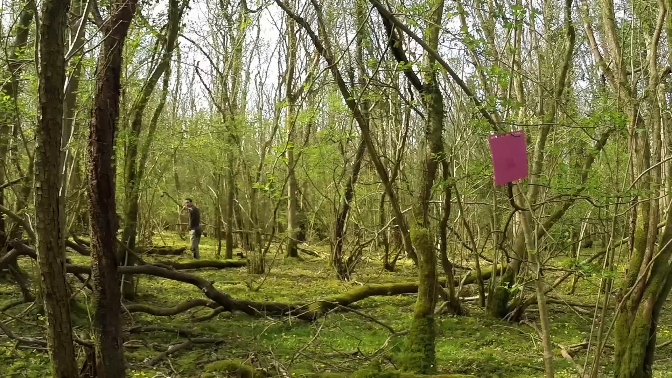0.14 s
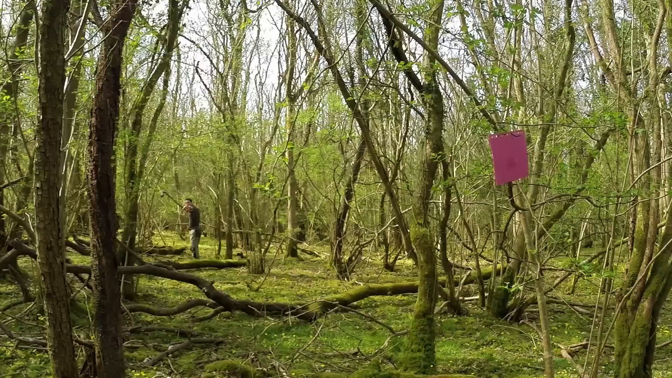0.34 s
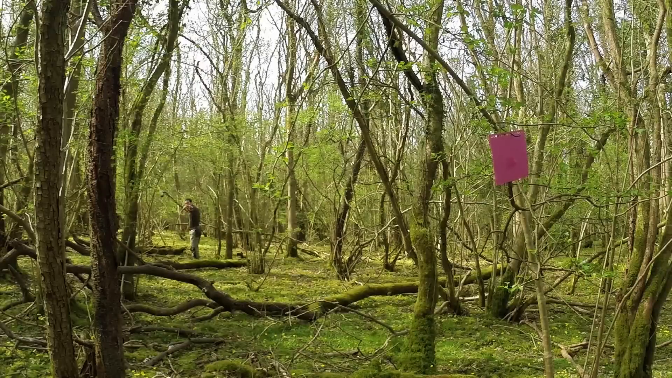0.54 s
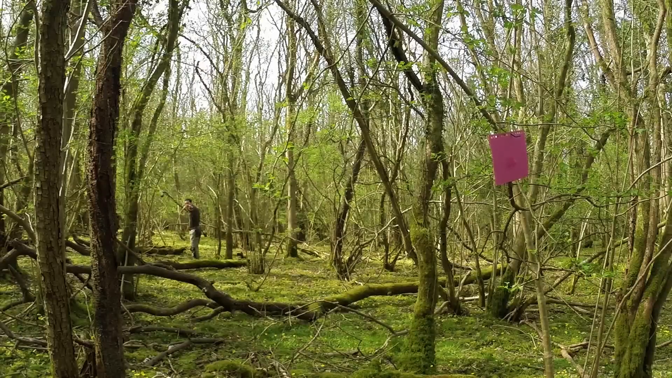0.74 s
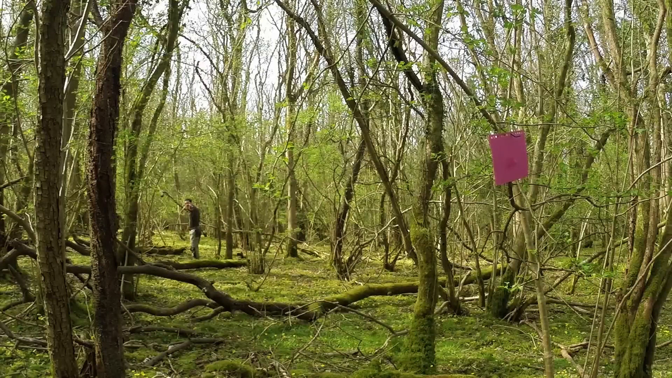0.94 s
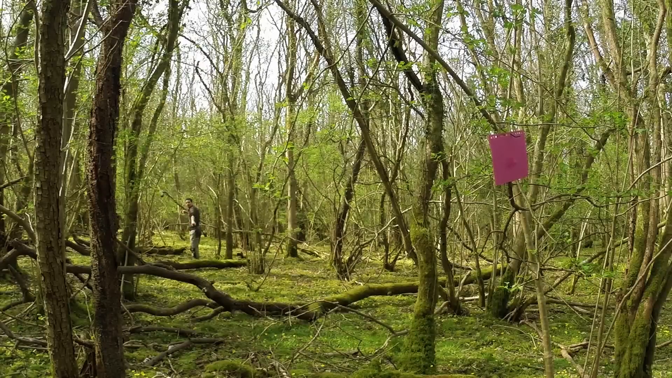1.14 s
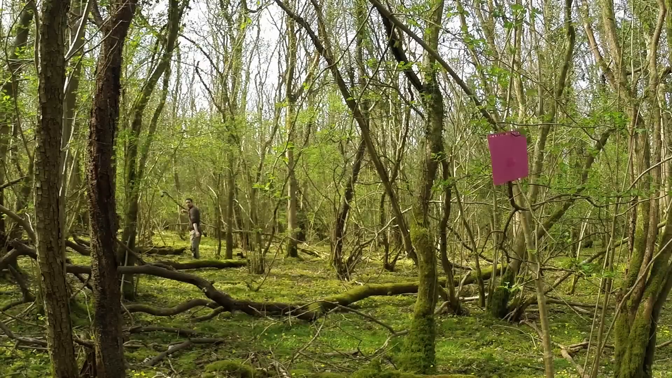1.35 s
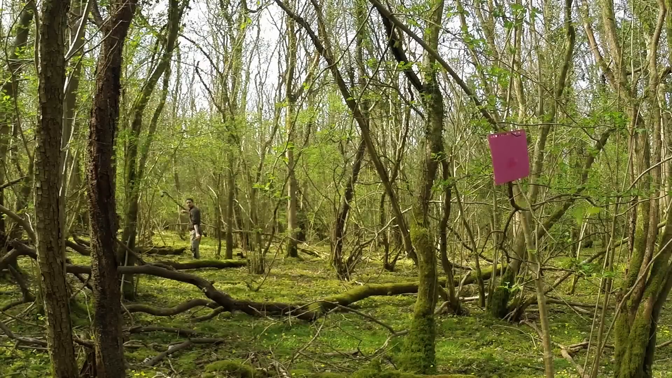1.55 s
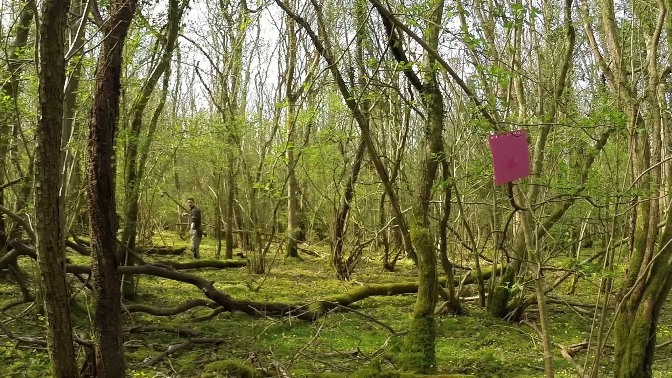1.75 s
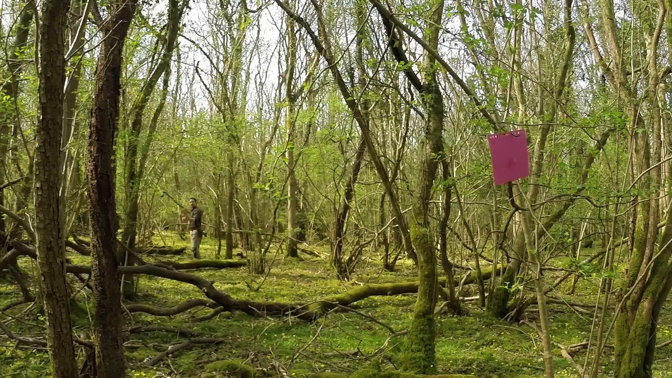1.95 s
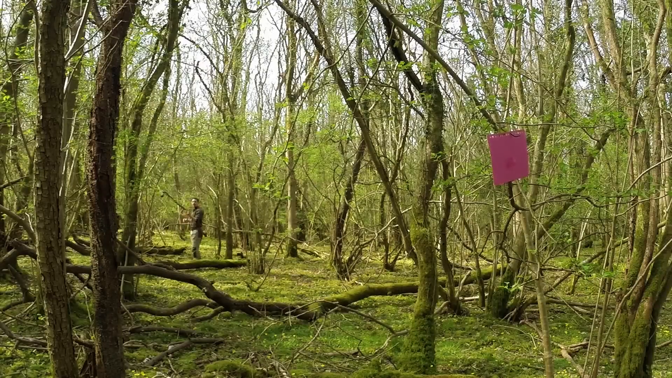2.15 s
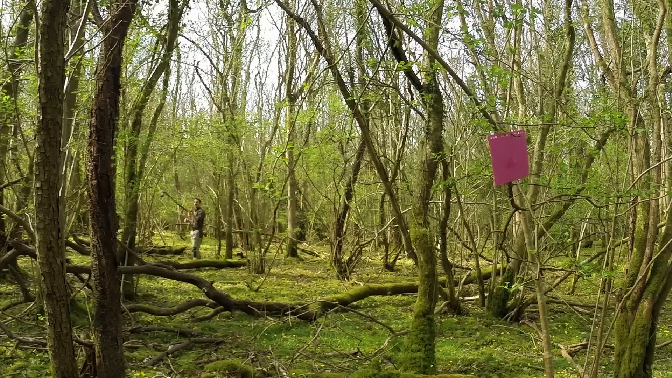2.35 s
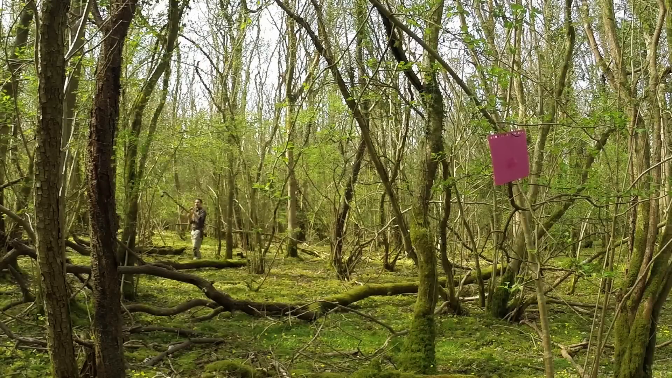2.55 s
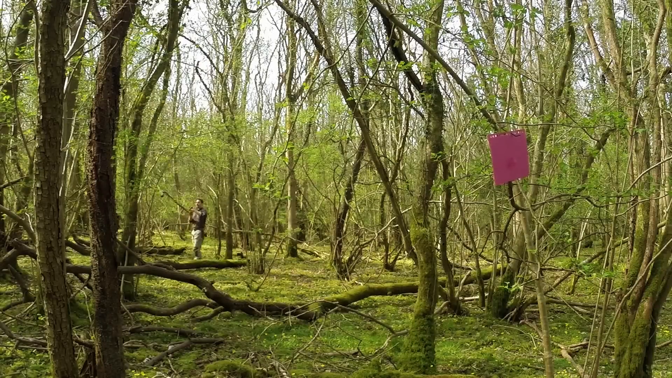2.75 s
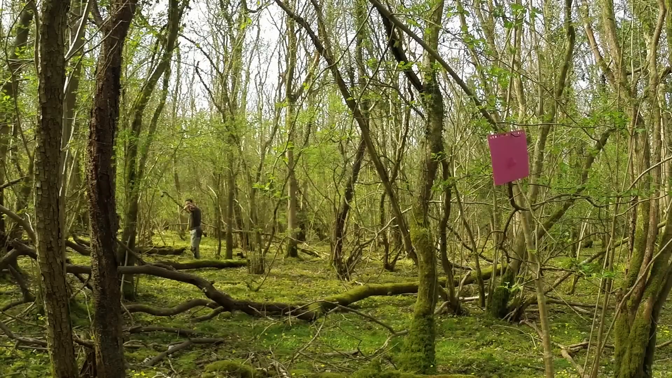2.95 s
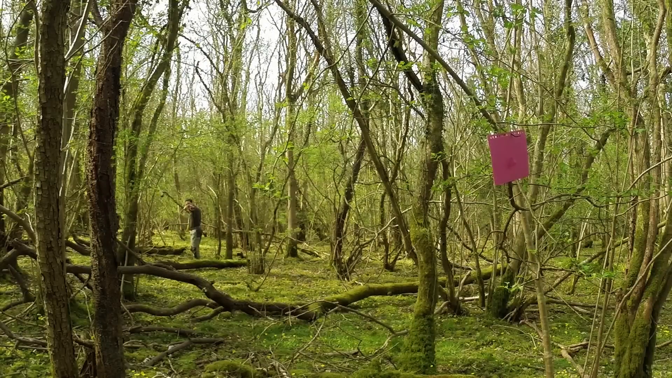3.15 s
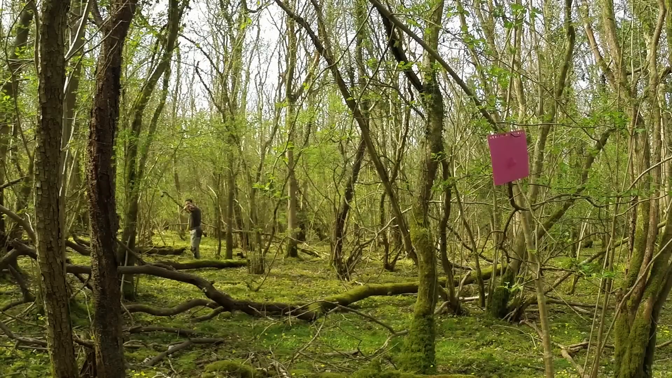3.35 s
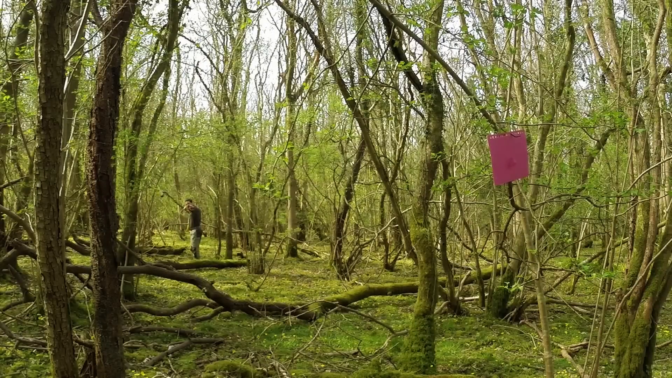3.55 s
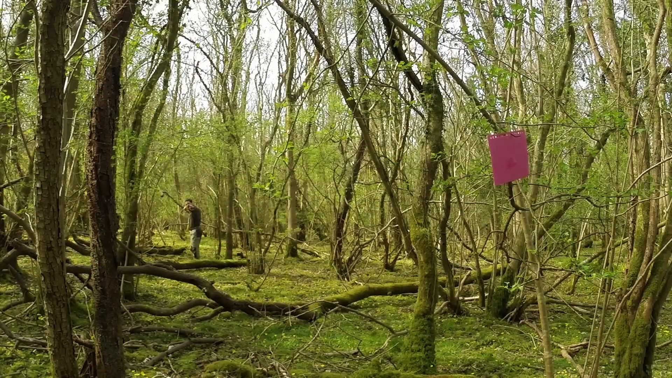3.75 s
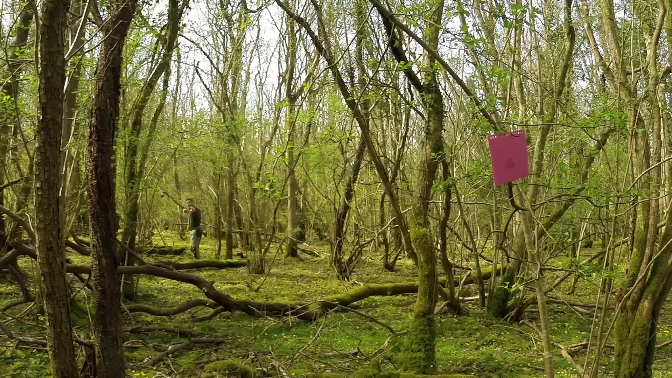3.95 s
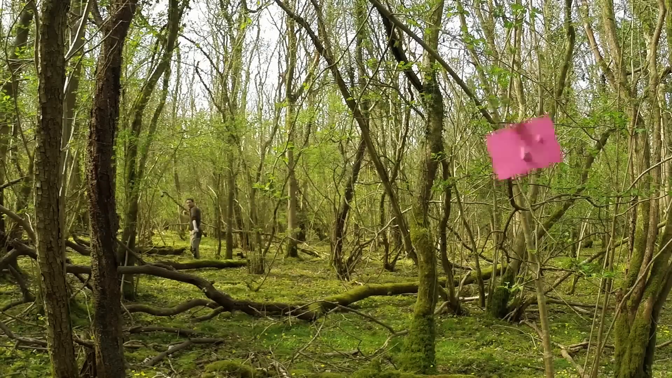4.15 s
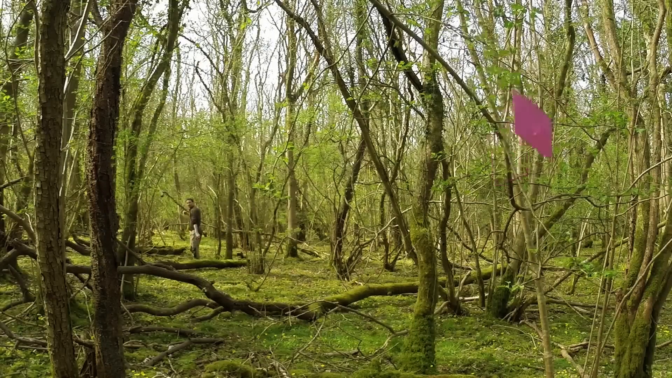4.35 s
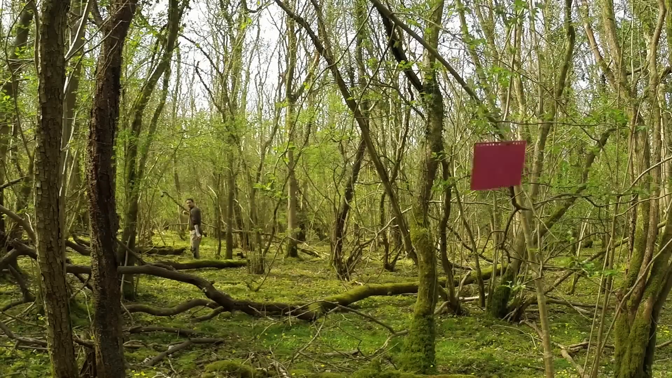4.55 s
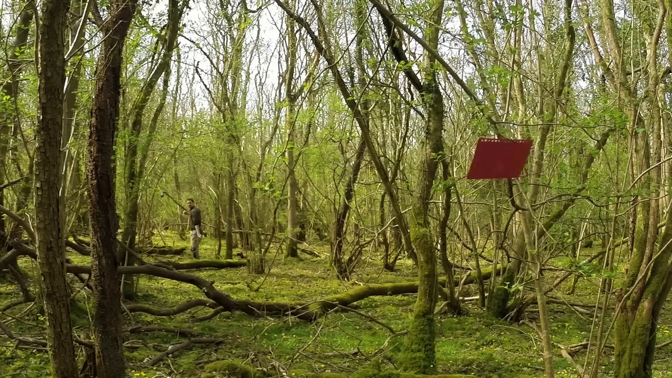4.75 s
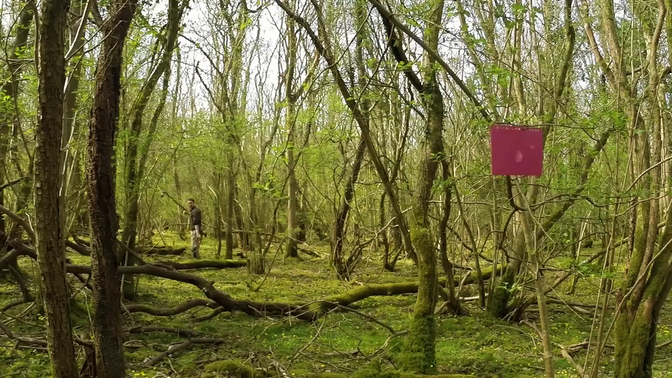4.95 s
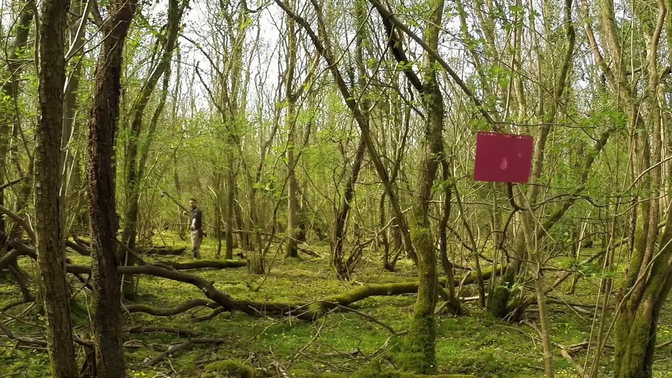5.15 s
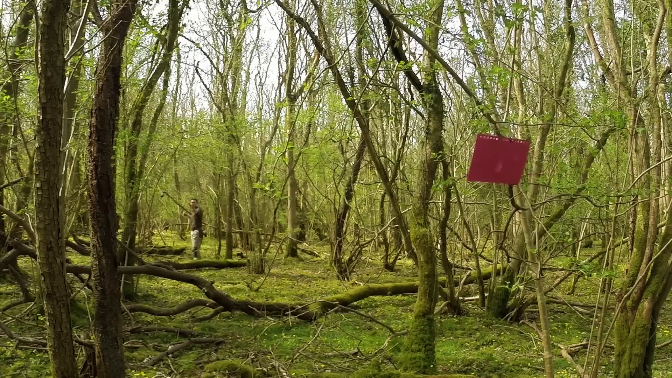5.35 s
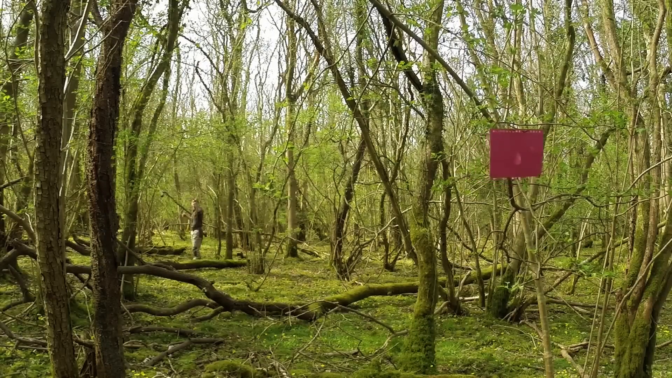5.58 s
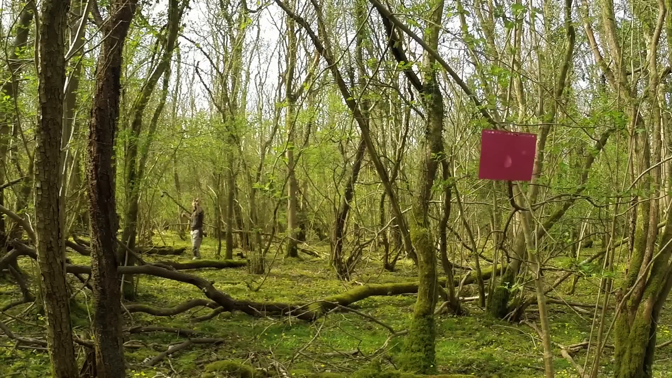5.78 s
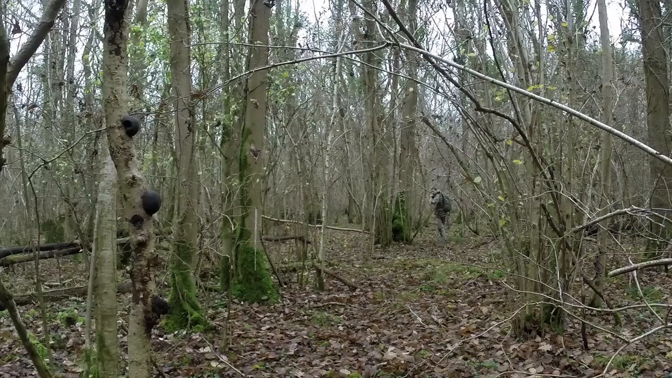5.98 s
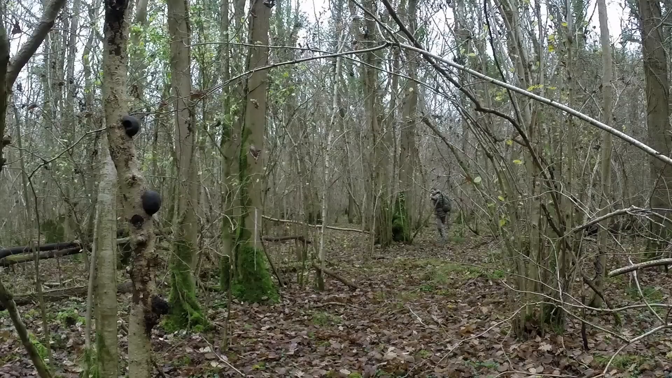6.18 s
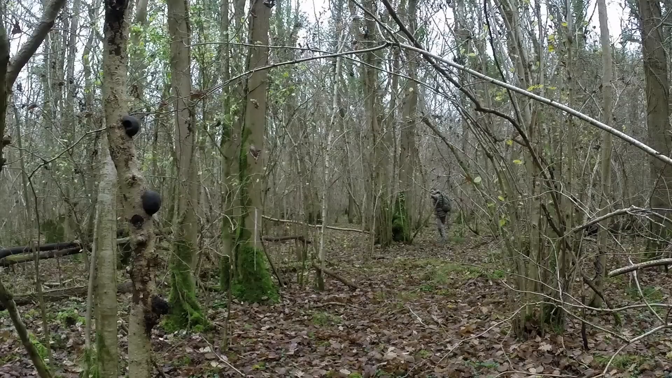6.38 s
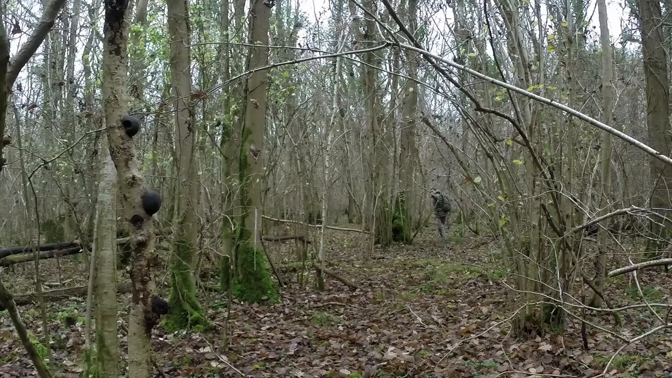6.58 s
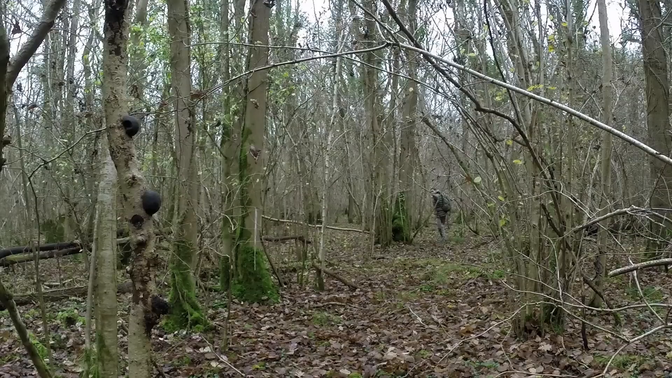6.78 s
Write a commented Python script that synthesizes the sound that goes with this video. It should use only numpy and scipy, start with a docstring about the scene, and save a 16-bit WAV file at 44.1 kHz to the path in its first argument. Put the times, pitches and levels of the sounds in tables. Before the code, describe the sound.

A microphone stands near a hanging card in an open wood, with soft air hiss and far birds all around. Two slingshot shots come about three seconds apart: the first passes with a short falling whistle and knocks wood behind; the second hits the card in a loud, overloaded crack. Short dry echoes scatter from trunks, the cord hums briefly, birds chirp and low wind gusts in.

```python
"""Far birds call and drum in an airy wood. A slingshot snaps, its ball whistles past and knocks on trees
and a log behind; high slurs and held notes of song follow. A second shot smacks a card hung near the
microphone, whose cord hums as it swings; chirps and rising wind close the scene. Cracks are shaped noise
with decaying sines and a hiss scattered by trunks; calls and whistles are blurred tones; air and wind are
coloured noise."""
import sys
import numpy as np
from scipy import signal
from scipy.io import wavfile
from scipy.ndimage import uniform_filter1d

SR = 44100
rng = np.random.default_rng(int(sys.argv[2]) if len(sys.argv) > 2 else 0)


def to_linear_factor(level_db):
    """Convert decibel levels (scalar or array-like) to linear amplitude factors."""
    exponent = np.asarray(level_db, float) / 20
    return 10 ** exponent


def persist_wave(psi):
    """Save psi, clipped to +-1, as 16-bit WAV."""
    counts = np.round(np.clip(psi, -1, 1) * 32767).astype(np.int16)
    wavfile.write(sys.argv[1], SR, np.atleast_2d(counts).T)


N = 300762  # samples

# how long trunks return sound, before each use scales it: f/Hz, t60/s
TRUNK_DECAY = [(150, 0.35), (500, 0.88), (1500, 0.97), (3000, 0.87), (6000, 0.64), (10000, 0.38),
               (15000, .3)]
# colour of the ball's cracks on wood and card: f/Hz, level/dB per Hz
BALL_CRACK = [(59, -46), (100, -18), (575, -28.5), (1150, -23.5), (1870, -2.5), (3040, -1.5), (5250, -17.5),
              (6620, -12.5), (8000, -18.5), (9470, -15), (15400, -41)]
# colour of the hiss that bands and twigs leave among the trunks: f/Hz, level/dB per Hz
RUBBER_SCATTER = [(35, -38), (60, 1.5), (225, 7.5), (431, -4.5), (845, 1), (1820, -4.5), (2570, -1),
                  (4100, -2.5), (4930, 2.5), (6510, -6), (10600, -8), (14000, -21), (15400, -20)]
HITS_APART_DB = -18.5  # added to the side level: single hits arrive almost alike left and right
NOTE_EDGE_S, NOTE_EDGE_DB = .02, -7  # longest swell of a plain note; level at both ends of a note
CARD_RISE_S = 0.00044  # onset of blows on card and log


def evened(x):
    """Scales a signal to rms 1."""
    return x / np.sqrt(np.mean(x ** 2) + 1e-20)


def read(points, hz):
    """Reads a curve of (Hz, value) points along a logarithmic frequency axis."""
    f, value = np.transpose(points)
    return np.interp(np.log(hz + 1), np.log(f + 1), value)


def add(mix, s, sound):
    """Lays a sound into the mix at s seconds, cut at the end of the mix."""
    part = mix[:, round(s * SR):][:, :sound.shape[-1]]
    part += sound[..., :part.shape[1]]


def pan(db):
    """Left and right gains that differ by db, positive to the left."""
    return to_linear_factor(np.array([[db / 2], [-db / 2]]))


def flutter(size, grain_s):
    """Slow random wander of rms 1: noise averaged twice over the grain."""
    span = round(grain_s * SR)
    smooth = uniform_filter1d(rng.standard_normal(size), span)
    return evened(uniform_filter1d(smooth, span))


def resonate(x, hz, width):
    """Shifts the curve hz down to zero, smooths over about 1 / width, and shifts back."""
    turn = np.exp(2j * np.pi * np.cumsum(hz * np.ones(len(x))) / SR)
    r = np.exp(-np.pi * width / SR)
    return 2 * (turn * signal.lfilter([1 - r], [1, -r], x / turn)).real


def noise(count, size, colour, change_db=lambda hz, t: 0 * t, apart_db=0):
    """Left and right noise of a colour with rms 1, then changed over frequency and time."""
    # stereo width, side against mid: f/Hz, level/dB
    side_level = [(60, -53), (110, -50), (200, -31.5), (380, -25), (700, -24), (1290, -26), (2370, -30.5),
                  (4380, -17), (8080, -10), (14900, -15)]
    hz = np.fft.rfftfreq(size, 1 / SR)[:, None]
    t = np.arange(count * 4 // size + 5) * size / 4 / SR
    a, b, c, d = rng.standard_normal((len(t), len(hz), 4)).T
    mid = a + 1j * b
    side = (c + 1j * d) * to_linear_factor(read(side_level, hz) + apart_db)
    spectra = np.array([mid + side, mid - side]) * to_linear_factor(colour(hz))

    def to_sound(z):
        return signal.istft(z, nperseg=size, noverlap=size * 3 // 4)[1]

    plain = to_sound(spectra)
    changed = to_sound(spectra * to_linear_factor(change_db(hz, t)))
    return changed[:, :count] / np.sqrt(np.mean(plain ** 2))


def whistle(s, hz, db, blur_hz, fuzz):
    """A tone blurred by echoes or turbulence: part sine, part noise in a narrow moving band."""
    t = np.arange(s[0], s[-1], 1 / SR)
    hz = np.interp(t, s, hz)
    band = rng.standard_normal(len(t))
    for _ in range(2):
        band = resonate(band, hz, blur_hz)
    sine = np.sin(2 * np.pi * np.cumsum(hz) / SR)
    tone = evened((1 - fuzz) * sine + fuzz * evened(band))
    return s[0], tone * to_linear_factor(np.interp(t, s, db)) * signal.windows.tukey(len(t), .1)


def scatter_db(hz, t, linger):
    """Near and deep trunks return sound at two speeds of decay."""
    deep_db, deep_linger = -15, 2.6  # level and stretch of t60 for the depth of the wood
    t60 = linger * read(TRUNK_DECAY, hz)
    return 20 * np.log10(to_linear_factor(-60 * t / t60) + to_linear_factor(deep_db - 60 * t / (deep_linger * t60)))


def hit(mix, row, crack, hiss, rise, ring=(), pan_db=0):
    """A short crack with whatever rings, then its scatter from trunks, the treble dying first."""
    s, level_db, hiss_db, t60, tilt_db, linger = row
    near_db, near_t60 = 5.5, 0.099  # early extra from the closest trees, t60 in s
    grain_db, grain_s = 1.8, .002  # single trunks stand out of the scatter

    def tilted(colour):
        return lambda hz: read(colour, hz) + tilt_db * np.log2(hz / 2500 + .01)

    t = np.arange(2 * SR) / SR
    short = t[:4096]
    burst = noise(len(short), 256, tilted(crack), apart_db=HITS_APART_DB)
    for hz, db, ring_t60 in ring:
        ring_level = to_linear_factor(db + tilt_db * np.log2(hz / 2500) - 60 * short / ring_t60)
        burst = burst + ring_level * np.sin(2 * np.pi * hz * short)
    burst = burst * pan(pan_db) / np.sqrt(1 + len(ring))
    shape = (1 - np.exp(-(short / rise) ** 2)) * to_linear_factor(-60 * short / t60)
    add(mix, s, to_linear_factor(level_db) * burst * shape / shape.max() / 2)

    tail = noise(len(t), 256, tilted(hiss), lambda hz, t: scatter_db(hz, t, linger), HITS_APART_DB)
    onset = (1 - np.exp(-(t / 0.0029) ** 2)) * (1 + to_linear_factor(near_db - 60 * t / near_t60))
    add(mix, s, to_linear_factor(level_db + hiss_db + grain_db * flutter(len(t), grain_s)) * tail * onset)


def air():
    """Far traffic, leaves and microphone hiss: steady coloured noise with faint patches."""
    # colour of the air: f/Hz, level/dB per Hz
    air_colour = [(12, -42), (20, -16.5), (59, -6.5), (103, -6), (152, -2.5), (185, -9.5), (314, -10),
                  (403, -13), (646, -13), (830, -14), (902, -16), (4050, -21.5), (6310, -24.5),
                  (13800, -26.5), (15400, -33.5)]
    # lift of lows and middle over time: t/s, level/dB
    low_lift = [(0, 11.5), (.3, 4.5), (.7, 2.5), (1.5, 3.9), (2.5, 2), (5, 3.5), (5.7, 2.4), (6.82, -2.5)]
    # leaf treble, rising with the wind: t/s, level/dB
    leaf_lift = [(0, 0.1), (5.7, -0.8), (6.0, 0.5), (6.82, 1.5)]

    def patches(hz, t):
        field = rng.standard_normal((len(t), len(hz))).T
        field = evened(uniform_filter1d(uniform_filter1d(field, 12, 0), 16, 1))
        low = np.interp(t, *np.transpose(low_lift)) * np.clip(1.2 - hz / 5000, 0, 1)
        treble = np.interp(t, *np.transpose(leaf_lift)) * np.clip(hz / 6000, 0, 1)
        return 1.2 * field + low + treble

    return to_linear_factor(-58) * noise(N, 1024, lambda hz: read(air_colour, hz), patches)


def wind():
    """Lumpy rumble, part of it ringing in two hollows: noise through narrow, fluttering resonances."""
    # gusts: t/s, level/dB
    gusts = [(5.6, -69), (5.684, -65.5), (6.088, -38.5), (6.136, -46), (6.2, -36.5), (6.268, -41.5),
             (6.296, -38), (6.82, -36.5)]
    # colour of the rumble: f/Hz, level/dB per Hz
    rumble_colour = [(12, -53), (20, -12.5), (109, -9.5), (185, 0), (271, -16.5), (367, -26), (1010, -28.5),
                     (1230, -36), (1640, -31), (1920, -42.5), (2500, -48), (3250, -72.5), (5500, -120)]
    # what the wind blows over: f/Hz, width/Hz, level/dB
    hollow_rows = [(161.4, 45.4, 2), (203.8, 56, 0.5)]
    s, db = np.transpose(gusts)
    t = np.arange(s[0], s[-1], 1 / SR)
    rumble = noise(len(t), 2048, lambda f: read(rumble_colour, f))
    hollow = np.zeros(len(t))
    for hz, width, hollow_db in hollow_rows:
        ringing = resonate(resonate(rng.standard_normal(len(t)), hz, width), hz, width)
        hollow += to_linear_factor(hollow_db + 1.4 * flutter(len(t), 0.052)) * evened(ringing)
    return s[0], evened(to_linear_factor(-2) * rumble + evened(hollow)) * to_linear_factor(np.interp(t, s, db))


def note(s, length, from_hz, to_hz, db, blur_hz=108):
    """A glide of narrow noise that swells in, holds and lets go."""
    edge = min(NOTE_EDGE_S, length / 3)
    u = np.array([0, edge, length - edge, length])
    level = db + NOTE_EDGE_DB * np.array([1, 0, 0, 1])
    return whistle(s + u, from_hz + (to_hz - from_hz) * u / length, level, blur_hz, fuzz=1)


def smear(s, length, hz, db, blur_hz):
    """A band of tone whose level flutters."""
    s, band = note(s, length, hz, hz, db, blur_hz)
    return s, band * to_linear_factor(1.5 * flutter(len(band), .015))


def moans(mix):
    """Faint bands of tone with the wind."""
    # t/s, length/s, f/Hz, level/dB, blur/Hz
    moan_rows = [(5.72, 0.566, 985, -62.5, 92), (5.95, 0.37, 740, -62, 59), (6.45, 0.57, 880, -60.5, 540),
                 (9.3, 0.53, 1447, -68, 310)]
    for row in moan_rows:
        add(mix, *smear(*row))


def rattle(count=9):
    """Woodpecker: ever quicker blows on a hollow trunk, each note smeared by the way through the wood."""
    # notes of the trunk: f/Hz, level/dB, t60/s
    trunk_notes = [(1410, 0, .06), (1165, -3, .075), (800, -10, .06), (1610, -9, .05)]
    # lag of each note: t/s
    note_lags = [.001, .015, .005, .002]
    first, gap, shrink = .002, .053, .965  # first blow and first gap in s, ratio of successive gaps
    drum_db, fade_db = -45, -.4  # level, change per blow
    t, out = np.arange(SR) / SR, np.zeros(SR)
    for (hz, db, t60), late in zip(trunk_notes, note_lags):
        for k in range(count):
            blow_s = first + late + gap * (1 - shrink ** k) / (1 - shrink)
            u = np.maximum(t - blow_s, 0)
            level = drum_db + db + fade_db * k + 1.5 * rng.standard_normal()
            swing = (1 - np.exp(-u / 0.0013)) * to_linear_factor(level - 60 * u / t60)
            out += swing * np.sin(2 * np.pi * (hz * rng.uniform(.99, 1.01) * t + rng.random()))
    return 0, out


def chip(s, length, hz, db):
    """A sharp call: quick rise in level and pitch, short body, long faint trail."""
    u = np.array([0, .015, .05, length])
    level = db + np.array([-20, 0, -15, -20])
    return whistle(s + u, hz * np.array([.95, 1, 1, 1]), level, 170, fuzz=1)


def slur(s, length, from_hz, to_hz, db):
    """Hangs high and thin, then drops as it swells."""
    u = np.linspace(0, 1, num=20)
    hz = from_hz + (to_hz - from_hz) * u ** 2.5
    return whistle(s + u * length, hz, db - 8.5 * (1 - u), 200, fuzz=1)


def held(s, length, hz, db):
    """A song note that slides up into its pitch, holds and sags."""
    u = np.array([0, .25, .75, 1]) * length
    level = db + NOTE_EDGE_DB * np.array([1, 0, 0, 1])
    return whistle(s + u, hz * np.array([.96, 1, 1, .985]), level, 110, fuzz=.75)


def chirps(mix, count=8):
    """A row of rising chirps: one upward sweep repeated, a little softer each time."""
    first, apart, length = 5.383, .0972, .026  # s
    low_hz, high_hz = 3700, 4300
    for k in range(count):
        db = -63.5 - .4 * k
        s = first + k * apart + length * np.array([0, .5, 1])
        sweep = [low_hz, (low_hz + high_hz) / 2, high_hz]
        add(mix, *whistle(s, sweep, db + np.array([-2.5, 0, -3]), 150, fuzz=.3))


def through_wood(dry):
    """Far calls arrive partly direct, partly scattered by trunks: decaying noise as an echo."""
    wood = noise(SR, 256, lambda hz: 0 * hz, lambda hz, t: -60 * t / (.7 * read(TRUNK_DECAY, hz)))
    wood = signal.sosfilt(signal.butter(1, [2500, 11000], "band", fs=SR, output="sos"), wood)
    echo = signal.fftconvolve(dry, wood / np.linalg.norm(wood[0]), axes=1)[:, :N]
    return to_linear_factor(-1.5) * dry + to_linear_factor(-7) * echo


def birds():
    """Far calls, song and drumming, heard through the wood; levels are those before that path."""
    # sharp calls that trail off: t/s, length/s, f/Hz, level/dB
    chip_rows = [(.535, 0.31, 2850, -44.5), (.783, 0.29, 2902, -43), (3.542, 0.58, 2818, -47.5),
                 (3.621, .17, 2784, -52), (3.795, .1, 3003, -47.5)]
    # single whistled notes: t/s, length/s, from f/Hz, to f/Hz, level/dB
    note_rows = [(0, 0.023, 2240, 2200, -48.5), (0.075, 0.042, 2060, 2010, -54.5),
                 (0.038, 0.077, 3270, 3090, -59), (.68, 0.098, 3260, 3300, -68),
                 (3.676, 0.2, 3160, 3100, -62.5), (4.68, .07, 5000, 5100, -62),
                 (4.77, 0.079, 4400, 3500, -55), (5.08, 0.064, 7020, 7050, -74)]
    # high slurs that open the song: t/s, length/s, from f/Hz, to f/Hz, level/dB
    slur_rows = [(1.635, 0.15, 7900, 7630, -56.5), (1.85, 0.11, 7880, 7130, -56.5),
                 (1.997, 0.096, 7640, 6900, -51.5)]
    # held notes of the song: t/s, length/s, f/Hz, level/dB
    held_rows = [(2.145, 0.12, 6710, -58.5), (2.356, .12, 6860, -58.5), (2.566, 0.104, 6790, -57),
                 (2.761, 0.11, 6910, -60)]
    # partials of a held note: share of its pitch [ratio], lag/s
    partials = [(1, 0), (.5, 0), (.638, .02)]
    # gain of each partial: level/dB
    partial_levels = [-2, -6.5, -6.5]
    # far warbling, too smeared to tell notes apart: t/s, length/s, f/Hz, level/dB, blur/Hz
    warble_rows = [(.25, .29, 2930, -59.5, 620), (2.24, .3, 2590, -62.5, 200),
                   (2.292, 0.15, 2960, -65.5, 150), (2.63, 0.26, 2870, -61, 250),
                   (2.73, .27, 2560, -58, 252), (3, .2, 2750, -63, 500), (3.36, .16, 2400, -67, 150),
                   (2.9, .5, 1800, -74, 150), (3.64, .36, 1880, -71.5, 200), (3.81, .21, 2955, -51.5, 300),
                   (5.682, 0.26, 2340, -69, 200)]
    dry = np.zeros((1, N))
    add(dry, *rattle())
    for call, rows in [(chip, chip_rows), (note, note_rows), (slur, slur_rows), (smear, warble_rows)]:
        for row in rows:
            add(dry, *call(*row))
    for s, length, hz, db in held_rows:
        for (share, late), partial_db in zip(partials, partial_levels):
            add(dry, *held(s + late, length, hz * share, db + partial_db))
    chirps(dry)
    return through_wood(dry)


def ticks(mix):
    """Pouch letting go, twigs clipped or dropping: dry cracks without ring."""
    # t/s, level/dB, hiss against crack/dB, t60/s, treble tilt/dB per octave, linger [factor]
    tick_rows = [(1.102, -32, -11, 0.0073, -0.5, 0.23), (1.2838, -7, -30.5, 0.0094, -1.4, 0.21),
                 (2.5586, -31, -36, .008, 1, .3), (4.014, -25.5, -18.5, .01, -2.5, .3),
                 (4.873, -47.5, -9.5, 0.006, 4.5, .3), (6.117, -52.5, -15, .01, -1, 0.56)]
    # colour of a twig: f/Hz, level/dB per Hz
    twig_crack = [(120, -44), (200, -12.5), (713, -11), (1900, 1), (5070, -13), (6660, -15), (13300, -8),
                  (15400, -20)]
    for row in tick_rows:
        hit(mix, row, twig_crack, RUBBER_SCATTER, .0003)


def pushes(mix):
    """Low pushes of air from bands, blows and swinging card: a few cycles, pressure downwards first."""
    # t/s, level/dB, f/Hz, t60/s, left against right/dB
    push_rows = [(1.119, -25.5, 101, 0.12, 0), (1.282, -44, 286, 0.034, -1), (1.423, -23.5, 209, 0.041, 0),
                 (4.032, -22.5, 93, 0.085, 0), (4.2066, 12, 81, 0.027, .4), (4.352, -28, 152, 0.09, 2),
                 (4.672, -40.5, 445, 0.14, 1), (4.891, -31, 169, 0.058, 0)]
    t = np.arange(SR // 2) / SR
    for s, db, hz, t60, pan_db in push_rows:
        decay = to_linear_factor(db - 60 * t / t60) * (1 - np.exp(-t / 0.00033))
        add(mix, s, -np.sin(2 * np.pi * hz * t) * decay * pan(pan_db))


def cord(count=6):
    """Hum of the card's cord: pitch follows its pull, tightening and slackening; it fades, to the left."""
    s, length, taut = 4.225, .24, .33  # start and length in s, share of the length when tautest
    slack_hz, taut_hz = 155, 200
    u = np.linspace(0, 1, num=30)
    hz = slack_hz + (taut_hz - slack_hz) * np.exp(-((u - taut) / .25) ** 2)
    hum = 0
    for k in range(count):
        level = -29.5 - 20 * u - 3 * k  # dB: fades over the length, weaker overtones
        hum = hum + whistle(s + u * length, hz * (k + 1), level, 20, fuzz=.1)[1]
    return s, hum * pan(6)


def log_knocks(mix):
    """The ball knocks on a log, which rings and scatters."""
    # t/s, level/dB, hiss against crack/dB, t60/s, treble tilt/dB per octave, linger [factor]
    log_rows = [(1.845, -24, -16.5, 0.0081, .1, 0.97)]
    # colour of the scatter: f/Hz, level/dB per Hz
    log_scatter = [(120, -61), (200, -31), (266, -13), (473, -10), (1190, 1), (2730, -5), (6040, -25),
                   (7670, -43), (9000, -41), (11700, -71), (19800, -120)]
    # modes of the log: f/Hz, level/dB, t60/s
    log_modes = [(1090, 2.3, .03), (1900, 5.2, 0.023), (2850, 1.8, 0.03)]
    for row in log_rows:
        hit(mix, row, BALL_CRACK, log_scatter, CARD_RISE_S, log_modes)


def tree_knocks(mix):
    """The ball knocks on trees, which ring briefly and scatter."""
    # t/s, level/dB, hiss against crack/dB, t60/s, treble tilt/dB per octave, linger [factor]
    tree_rows = [(1.4218, -2.5, -22, 0.0059, 0.174, 0.72), (4.3518, -4, -19, 0.0072, 0.09, 0.7)]
    # colour of the scatter: f/Hz, level/dB per Hz
    tree_scatter = [(100, -15.5), (240, -8), (500, -11.5), (900, -15.5), (1350, -5.5), (1700, -2.5),
                    (2300, -3.5), (2800, 1.5), (3600, -5), (4200, -13.5), (6500, -15), (10300, -21),
                    (14400, -33), (15400, -74)]
    # modes of the wood: f/Hz, level/dB, t60/s
    tree_modes = [(2400, -38, 0.044), (2750, 9, 0.021), (3280, 12.5, 0.022)]
    for row in tree_rows:
        hit(mix, row, BALL_CRACK, tree_scatter, .0018, tree_modes)


def flights(mix):
    """Air shed behind the ball: one wavering tone, Doppler-bent down in passing, over a wide rush."""
    # first heard t/s, nearest t/s, last heard t/s, whistle level/dB and rush level/dB when nearest
    flight_rows = [(1.17, 1.29, 1.325, -30, -37.5), (4.1, 4.2, 4.205, -36.5, -38.5)]
    # colour of the rush: f/Hz, level/dB per Hz
    rush_colour = [(180, -43.5), (300, -14), (577, -10.5), (658, -15), (1060, -0.5), (1670, -4),
                   (4470, -3.5), (5260, -10), (15000, -26.5)]
    ball_m_per_s, miss_m, shed_hz = 46, .75, 945
    for first, nearest, last, whistle_db, rush_db in flight_rows:
        t = np.arange(first, last, 1 / SR)
        along = ball_m_per_s * (t - nearest)
        away = np.hypot(along, miss_m)
        hz = shed_hz / (1 + ball_m_per_s * along / away / 343)  # speed of sound in m/s
        decades = np.log10(away / miss_m)
        leaving_db = -600 * np.maximum(t - nearest, 0)  # extra fade once past
        tone_level = whistle_db - 32 * decades + .4 * leaving_db
        add(mix, *whistle(t, hz, tone_level, 200, fuzz=1))
        rush = noise(len(t), 256, lambda f: read(rush_colour, f), apart_db=HITS_APART_DB)
        rush_level = rush_db - 11 * decades + leaving_db
        add(mix, first, rush * to_linear_factor(rush_level) * signal.windows.tukey(len(t), .05))


def card_hits(mix):
    """The ball smacks the hung card: a loud, fast crack with short rings, slightly to the right."""
    # t/s, level/dB, hiss against crack/dB, t60/s, treble tilt/dB per octave, linger [factor]
    card_rows = [(4.2052, 18.1, -25.5, 0.057, 0.1, 0.65)]
    # colour of the scatter: f/Hz, level/dB per Hz
    card_scatter = [(59, -82.5), (100, -55), (146, -6), (188, 9.5), (269, -31), (385, -19), (528, -18.5),
                    (994, -3), (2560, 0), (8340, -21.5), (11700, -21.5), (15400, -43.5)]
    # modes of the card: f/Hz, level/dB, t60/s
    card_modes = [(2320, 2, 0.0043), (2740, 11, 0.01), (3320, 3.3, 0.0073)]
    for row in card_rows:
        hit(mix, row, BALL_CRACK, card_scatter, CARD_RISE_S, card_modes, pan_db=-2)


def snaps(mix):
    """The bands snap and slap back: rubbery cracks with one ringing mode."""
    # t/s, level/dB, hiss against crack/dB, t60/s, treble tilt/dB per octave, linger [factor]
    snap_rows = [(1.1178, 3.5, -28, .011, 0.73, 0.57), (1.159, -16, -20.5, 0.012, 2.5, 0.9),
                 (4.029, 1, -26.5, 0.022, 1.5, 0.8), (4.0755, -8, -29.5, 0.014, 1, 0.38)]
    # colour of the crack: f/Hz, level/dB per Hz
    rubber_crack = [(35, -43.5), (60, 0), (375, -5), (788, 5.5), (1440, -8), (2290, 5), (4000, -3),
                    (5050, 1.5), (7310, -3.5), (13400, -5), (15400, -20)]
    # mode of the bands: f/Hz, level/dB, t60/s
    rubber_modes = [(915, -3.5, .03)]
    for row in snap_rows:
        hit(mix, row, rubber_crack, RUBBER_SCATTER, .002, rubber_modes)


def shots():
    """Bands, flight and blows, with the deep bass taken out; then hum and pushes."""
    mix = np.zeros((2, N))
    for source in (ticks, log_knocks, tree_knocks, flights, card_hits, snaps):
        source(mix)
    mix = signal.sosfilt(signal.butter(3, 70, "high", fs=SR, output="sos"), mix)
    add(mix, *cord())
    pushes(mix)
    return mix


def scene():
    """The air of the wood, birds and shots, with the wind and its moans on top."""
    mix = air() + birds() + shots()
    moans(mix)
    add(mix, *wind())
    return mix


def roll_off(x):
    """The treble ends steeply here."""
    return signal.sosfilt(signal.butter(12, 15520, fs=SR, output="sos"), x)


def record(dry):
    """Gain control drops some ms after an overload and climbs back; what it misses is clipped."""
    power_db = 10 * np.log10(signal.lfilter([.01], [1, -.99], (dry ** 2).mean(0)) + 1e-12)
    climb = np.arange(N) * 60. / SR  # peak hold falls by 60 dB per s
    held_db = np.maximum.accumulate(power_db + climb) - climb
    over_db = np.maximum(held_db + 7, 0)  # above a threshold of -7 dB
    lag = np.exp(-1 / (0.007 * SR))  # 7 ms
    ducked = dry / to_linear_factor(1.4 * signal.lfilter([1 - lag], [1, -lag], over_db))
    return roll_off(np.clip(ducked, -1, 1))


dry = scene()
out = record(dry)
persist_wave(out)
```